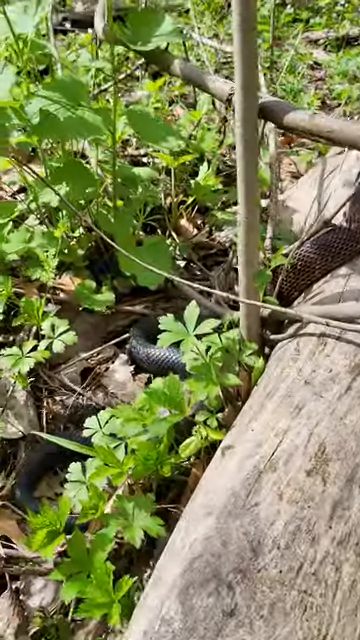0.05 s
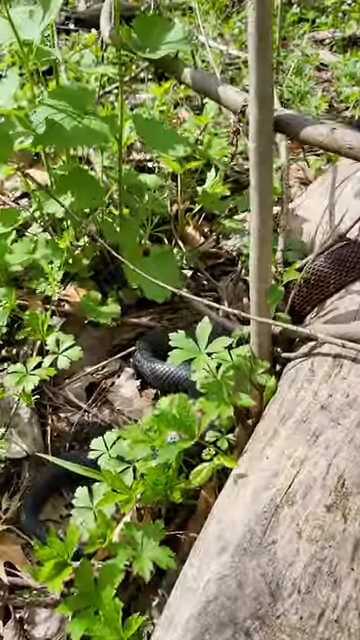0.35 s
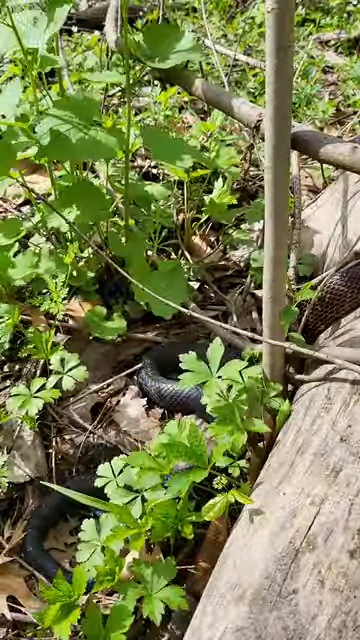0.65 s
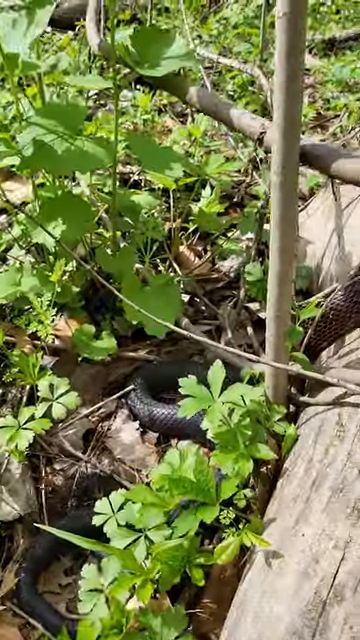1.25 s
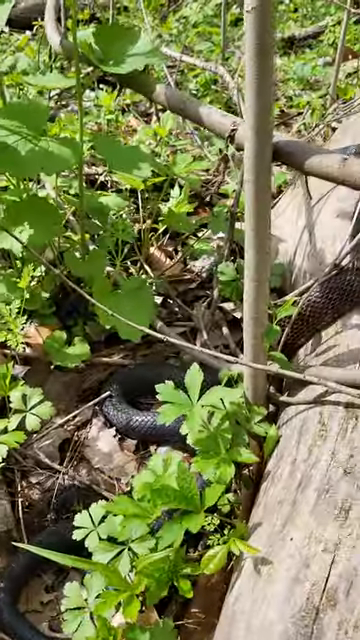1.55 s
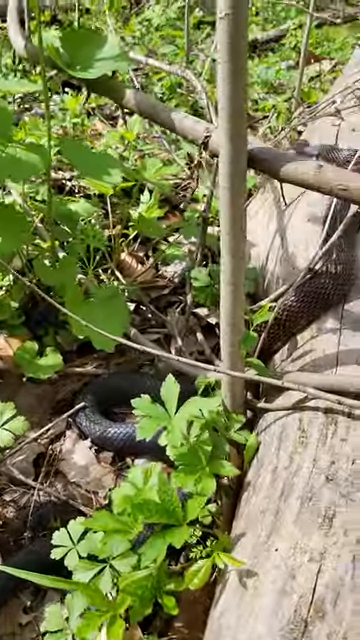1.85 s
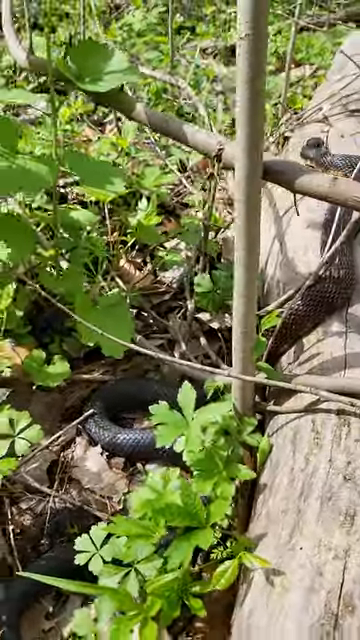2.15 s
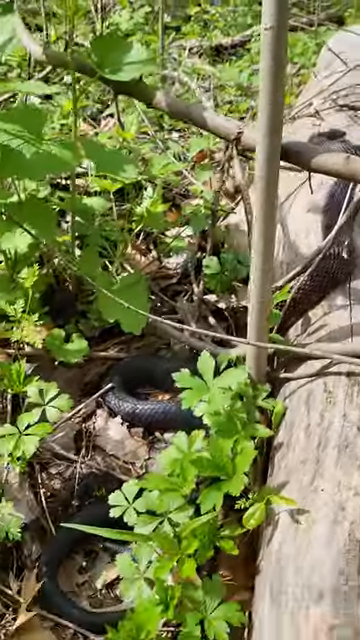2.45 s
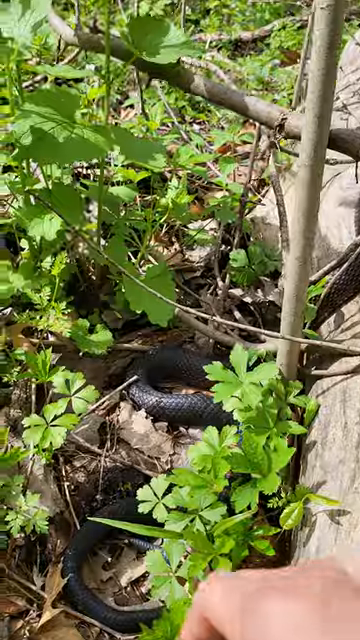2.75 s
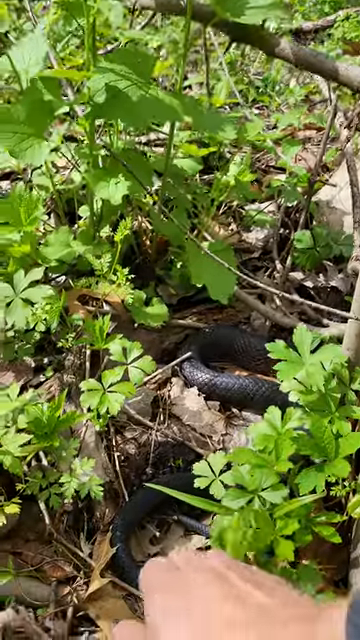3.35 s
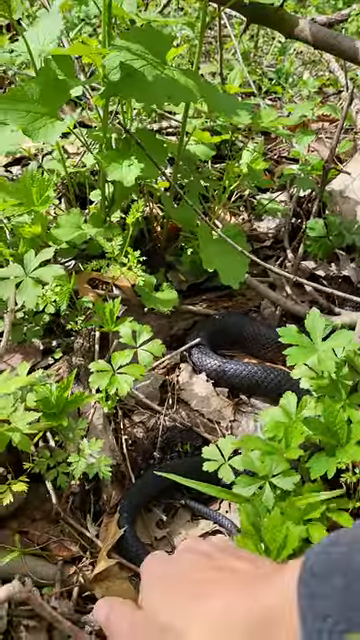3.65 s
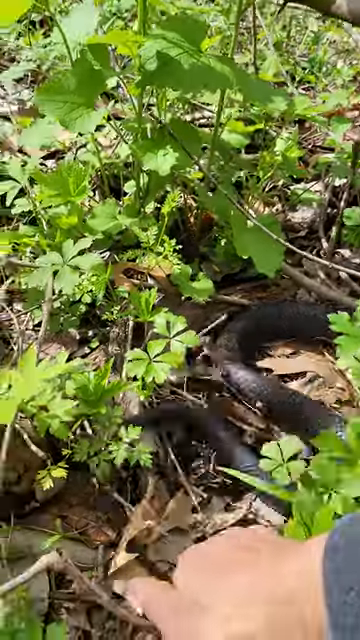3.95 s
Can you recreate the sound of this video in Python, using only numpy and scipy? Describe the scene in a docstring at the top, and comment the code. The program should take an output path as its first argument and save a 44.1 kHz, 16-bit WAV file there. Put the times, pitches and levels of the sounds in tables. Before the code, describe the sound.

A faint, papery rattle from a snake's tail in woodland leaf litter weakens and stops. Twigs knock, a sleeve swishes and leaves rustle near the microphone, while a low wind-like rumble and a far engine hum continue.

```python
"""A dry, fast rattle: a snake shakes its tail in leaf litter, about 39 strokes a second, then tires to a
faint ticking. Close by, someone shifts and reaches out: leaves snap, twigs knock, cloth swishes,
something scuffs and squeaks thinly, and leaves are brushed aside.
Under it lie a low outdoor rumble, a steady rush of air, a few soft buffets and a far engine's hum."""
import sys
import numpy as np
from scipy import signal
from scipy.fft import rfft, irfft
from scipy.io import wavfile

SR = 44100
rng = np.random.default_rng(int(sys.argv[2]) if len(sys.argv) > 2 else 0)


def store_pcm(level_fs):
    """Save levels as 16-bit WAV."""
    pcm = np.round(np.clip(level_fs, -1, 1) * 32767).astype(np.int16)
    wavfile.write(sys.argv[1], SR, np.atleast_2d(pcm).T)


N = 176400
TIME = np.arange(N) / SR


# Speed of the shake: t/s, rate/(strokes per s)
TAIL_RATE = [(0, 41.2), (.15, 39.5), (.45, 38.7), (.6, 38.3), (1.15, 38.65), (1.3, 36.5), (1.45, 37.5),
             (1.7, 37.2), (1.9, 38.8), (2.1, 37.3), (2.25, 36.3), (4, 36)]
# Effort of the shake, heard as loudness and brightness: t/s, level/dB, tilt/(dB per octave)
TAIL_EFFORT = [(0, -56, -1.5), (.45, -57.5, -1), (.7, -58.5, -1), (.85, -55.5, -1.5), (1.0, -53.8, 1.5),
               (1.15, -53.3, 1.5), (1.28, -56.5, 2), (1.5, -58, 0), (1.62, -64, -1), (1.82, -64, -.5),
               (1.87, -72, -3), (2.08, -72, -2), (2.24, -67.5, 0), (2.5, -90, 0)]
# Return stroke against forward stroke: t/s, level/dB
RETURN_STROKE = [(0, -8), (.45, -6), (.7, -1), (.9, -2), (1.15, -7), (1.3, -4), (1.8, -3), (2.05, -12)]
# Leaves the tip meets on every swing: delay/s, level/dB, decay/s, returning (1 = on the way back)
LEAF_CONTACTS = [(.0002, -3, .0022, 0), (.003, 0, .0018, 0), (.0083, -2.5, .001, 1), (.0118, 0, .0019, 1),
                 (.0187, -2.5, .0014, 1)]


def tail():
    """Each swing slaps the same few leaves, softer on the way back; they crackle as they settle."""
    first_stroke_s, attack_s, reach_s, ear_lag_s = .0062, .0003, .01, .00036
    forward_jitter_s, scatter_db, settle_db, litter_db = .0004, 1.5, -11, 5
    turns = np.cumsum(curve(TAIL_RATE)) / SR
    swings = np.interp(np.arange(int(turns[-1]) - 1), turns, TIME) + first_stroke_s
    return_gain = undb(curve(RETURN_STROKE))
    fractures = crackle(per_s=9000, scatter_db=2.2)
    contact = undb(settle_db) * return_gain
    for delay, db, decay_s, returning in LEAF_CONTACTS:
        for at, (late, strong) in zip(swings + delay, rng.standard_normal((len(swings), 2))):
            near = slice(max(int((at - reach_s) * SR), 0), int((at + reach_s) * SR))
            age = TIME[near] - at - forward_jitter_s * late * (1 + returning)  # looser on the way back
            slap = bell(age, np.where(age < 0, attack_s, decay_s))
            gain = undb(db + scatter_db * strong) * return_gain[near] ** returning
            contact[near] = np.hypot(contact[near], slap * gain)  # slaps add in power
    strokes = fractures * contact
    direct = np.array([np.roll(strokes, round(ear_lag_s * SR)), strokes])
    rattle = leaf_ring(direct + undb(litter_db) * litter(strokes))
    return unit(rattle) * undb(curve(TAIL_EFFORT)) * pan(-1.5)


# Papery ring of dry leaves: f/Hz, level/dB
LEAF_COLOUR = [(900, 0), (2000, -4), (3500, 1), (5000, -4), (6500, -.5), (7900, 4), (8800, -2), (9500, 4),
               (10500, -1), (11800, 2.2), (13700, -3.8), (15500, 2.2)]


def leaf_ring(x):
    """Strokes stir different leaves, so each band flickers on its own; harder shaking is brighter."""
    flicker_db, pivot_hz = 1.6, 8000
    centres, spacing = np.linspace(0, 16000, 9, retstep=True)
    spectrum = rfft(colour(x, LEAF_COLOUR))
    tilt = curve(TAIL_EFFORT, column=2)
    out = 0
    for hz in centres:
        band = irfft(spectrum * np.maximum(1 - np.abs(freqs() - hz) / spacing, 0), N)
        octaves = np.log2(max(hz, spacing) / pivot_hz)
        out = out + band * undb(flicker_db * wander(38) + tilt * octaves)
    return out


def crackle(per_s, scatter_db):
    """Random tiny fractures, a few much stronger than the rest."""
    hit = rng.random(N) < per_s / SR
    size = undb(scatter_db * np.minimum(rng.exponential(size=N), np.pi))
    return unit(hit * size * np.sign(rng.standard_normal(N)))


def litter(x, smear_s=.0005):
    """Scatter among many leaves smears each fracture into a brief hiss, different at each ear."""
    keep = np.exp(-1 / (smear_s * SR))
    power = signal.lfilter([1 - keep], [1, -keep], x ** 2)
    return np.sqrt(power) * rng.standard_normal((2, N))


def burst(at, decay_s, click_s=.0005, click_db=3):
    """A sharp click that dies away in a brief crack."""
    age = TIME - at
    shape = np.exp(-np.abs(age) / decay_s) + undb(click_db) * np.exp(-np.abs(age) / click_s)
    return rng.standard_normal((2, N)) * (age > 0) * shape


# Crisp single snaps: t/s, level/dB, f/Hz, ring against crack/dB, decay/s, pan L-R/dB
LEAF_SNAPS = [(.932, -52, 7660, 0, .0015, -5), (.982, -49, 9670, -6, .002, -5),
              (1.138, -50.5, 9600, -8, .0025, -5), (1.165, -51, 8140, -2, .0025, -5),
              (1.3265, -53.5, 8050, -3, .002, -5), (1.3555, -53, 7980, -2, .003, -5),
              (1.367, -50.5, 3750, 6.5, 0.0033, -5), (1.541, -53, 13600, 2, .0016, -4),
              (1.736, -58, 5900, -10, 0.0022, -1), (1.805, -54, 9000, -19, 0.0025, -1),
              (2.016, -59, 4470, -12, 0.0044, -4), (2.272, -56, 9150, -25, 0.0028, 0),
              (2.287, -55.5, 6944, -11, 0.0033, -1), (3.209, -64, 6700, 3, 0.0015, -3),
              (3.276, -62, 8800, -8, 0.0024, -5), (3.414, -60, 4504, -6, 0.0033, -7),
              (3.540, -59, 3560, 11, 0.0045, -6), (3.541, -53, 7850, 4, .0052, -8),
              (3.697, -58, 12000, -6, 0.002, -4)]


def leaf_snaps(q=13):
    """Dry leaves crack, each with a ring of its own."""
    out = 0
    for at, db, hz, ring_db, decay_s, side_db in LEAF_SNAPS:
        crack = burst(at, decay_s)
        tone = ring(crack, hz, hz / q) * np.sqrt(SR * q / hz / np.pi)  # as strong as the crack
        out = out + undb(db) * pan(side_db) * (colour(crack, LEAF_COLOUR) + undb(ring_db) * tone)
    return out


# Dull, woody knocks: t/s, level/dB, f/Hz, decay/s, pan L-R/dB
TWIG_KNOCKS = [(.2215, -40, 1600, .004, 2), (1.7225, -33.5, 700, .007, 1.5)]


def twig_knocks():
    """Twigs knock lower than the leaves, through a broad, heavily damped resonance."""
    out = 0
    for at, db, hz, decay_s, side_db in TWIG_KNOCKS:
        knock = double_ring(burst(at, decay_s), hz, .85 * hz) * np.sqrt(SR / hz) / 2
        out = out + undb(db) * pan(side_db) * knock
    return out


# Envelope of one short scuff: t/s, level/dB
SCUFF_LEVEL = [(1.99, -75), (2.003, -52), (2.009, -58), (2.016, -49), (2.023, -50), (2.034, -45.5),
               (2.048, -42), (2.054, -52), (2.065, -75)]
# Body of the scuff: f/Hz, half-width/Hz, level/dB
SCUFF_MODES = [(600, 400, -8), (1600, 150, -1), (2080, 340, -5), (2780, 140, -4.5), (3480, 100, -14),
               (4650, 450, -17), (9500, 2500, -22)]


def scuff():
    """Stick-slip catches ring a few resonances."""
    catches = litter(crackle(per_s=1630, scatter_db=.82))
    body = sum(undb(db) * unit(double_ring(catches, hz, 2 * half)) for hz, half, db in SCUFF_MODES)
    level_db = curve(SCUFF_LEVEL)
    gate = level_db > max(SCUFF_LEVEL[0][1], SCUFF_LEVEL[-1][1])
    return unit(body) * undb(level_db) * gate * pan(.9)


# Swell of the sleeve: t/s, level/dB
SLEEVE_LEVEL = [(0, -107), (2.42, -70), (2.6, -63.5), (2.85, -61), (3.05, -60.5), (3.23, -66.5),
                (3.45, -64), (3.62, -60), (3.78, -67.5), (4, -68)]
# Soft hiss of cloth: f/Hz, level/dB
SLEEVE_COLOUR = [(800, 7.5), (2200, 5.5), (4000, -4), (6000, -1.5), (7800, 0.5), (8800, -6), (11800, -3),
                 (13300, -6), (15500, -6)]


def sleeve(flicker_db=.9):
    """A sleeve swishes smoothly as the arm reaches out."""
    cloth = unit(colour(rng.standard_normal((2, N)), SLEEVE_COLOUR))
    return cloth * undb(curve(SLEEVE_LEVEL) + flicker_db * wander(15))


# Sudden rustle at the very end: t/s, level/dB
BRUSH_LEVEL = [(3.92, -91), (3.955, -53.5), (3.975, -46), (3.985, -43), (4, -43)]
# Full-bodied tone of that rustle: f/Hz, level/dB
BRUSH_COLOUR = [(200, 11), (900, 11.5), (2500, 6.5), (4500, 1), (7600, 8), (9000, 1.5), (13000, 1.5),
                (15500, 3)]


def brushed_leaves():
    """Leaves pushed aside give a dense run of tiny fractures."""
    rustle = colour(litter(crackle(per_s=2300, scatter_db=1.1)), BRUSH_COLOUR)
    return unit(rustle) * undb(curve(BRUSH_LEVEL)) * pan(.41)


# Soft rubs: t/s, level/dB, f/Hz, width/Hz, spread in time/s
CLOTH_RUBS = [(2.267, -65.5, 3280, 2500, .11), (2.7, -69, 3950, 2500, 0.17), (3.6, -71, 7400, 1000, 0.094)]


def cloth_rubs():
    """Cloth slides past the plants in soft swells of hiss."""
    out = 0
    for at, db, hz, width, spread_s in CLOTH_RUBS:
        hiss = unit(double_ring(rng.standard_normal((2, N)), hz, width))
        out = out + hiss * undb(db) * bell(TIME - at, spread_s)
    return out


# Thin squeaks, one list of points each: t/s, f/Hz, level/dB
SQUEAK_GLIDES = [
    [(2.015, 11750, -84), (2.04, 11550, -79), (2.08, 11950, -86)],
    [(2.095, 12700, -86), (2.135, 13050, -82), (2.16, 14200, -80), (2.182, 15700, -83)],
    [(2.35, 12050, -88), (2.38, 11550, -82), (2.405, 12050, -84)],
]


def squeaks(fade_s=.008, waver=.007):
    """Faint whistles that dip or glide upward at the top of hearing."""
    out = 0
    for glide in SQUEAK_GLIDES:
        start, end = glide[0][0], glide[-1][0]
        gate = np.clip(np.minimum(TIME - start, end - TIME) / fade_s, 0, 1)
        pitch_hz = curve(glide) * (1 + waver * wander(200))
        phase = 2 * np.pi * np.cumsum(pitch_hz) / SR
        out = out + np.sqrt(2) * np.sin(phase) * gate * undb(curve(glide, column=2))
    return out


def stray_ticks(level_db=-78.5):
    """Disturbed leaves tick faintly at random."""
    ticks = litter(crackle(per_s=38, scatter_db=5.3))
    return unit(colour(ticks, LEAF_COLOUR)) * undb(level_db)


# Soft, low thumps: t/s, level/dB, f/Hz, spread in time/s
WIND_BUFFETS = [(.305, -31.5, 65, 0.0066), (0.806, -35.5, 66, 0.018), (3.672, -30.5, 80, 0.0062)]


def wind_buffets():
    """Air bumps the microphone in brief low swells."""
    return sum(undb(db) * bell(TIME - at, spread_s) * np.sin(2 * np.pi * (hz * TIME + rng.random()))
               for at, db, hz, spread_s in WIND_BUFFETS)


# Drift of the engine's hum: t/s, f/Hz, level/dB
ENGINE_HUM = [(0, 87, -59), (.8, 84.16, -49.5), (1.4, 87.93, -46), (2.1, 87.15, -45.5), (2.6, 86.4, -59),
              (3.2, 88, -48), (4, 83, -50)]
# Its harmonics: multiple of the pitch, relative level/dB
ENGINE_HARMONICS = [(1, -1.5), (2, -14), (3, -21)]


def engine(waver=.016, flicker_db=2):
    """A far engine hums; its pitch wavers and each harmonic swells on its own."""
    pitch_hz = curve(ENGINE_HUM) * (1 + waver * wander(7.92))
    phase = 2 * np.pi * np.cumsum(pitch_hz) / SR
    hum = sum(undb(db + flicker_db * wander(5.6)) * np.sin(k * phase) for k, db in ENGINE_HARMONICS)
    return np.sqrt(2) * hum * undb(curve(ENGINE_HUM, column=2)) * pan(-1)


# Bass-heavy outdoor bed: f/Hz, level/dB
AIR_COLOUR = [(20, -18.5), (35, -7.5), (60, 2.5), (80, 0.5), (110, -1), (145, -8.5), (210, -13.5),
              (290, -15.5), (400, -16), (540, -24), (660, -20), (800, -19), (980, -22), (1200, -19.5),
              (1400, -20.5), (1650, -32.5), (2200, -33.5), (3400, -39), (5000, -44), (7800, -45.5),
              (8800, -61.5), (15500, -54.5)]
# Its stereo width: f/Hz, side against mid/dB
AIR_WIDTH = [(25, -20), (60, -11.5), (110, -21.5), (200, -10), (330, -3.5), (520, 3), (720, 1), (1290, 6),
             (2200, 1.5), (8000, 0)]
# Gentle fader ride on the rush of air: t/s, level/dB
RUSH_LEVEL = [(0, 1), (1, 0.75), (2, 1), (3, -1), (4, -0.5)]


def outdoors():
    """A nearly centred, unsteady rumble under a wide rush of air."""
    mid_db, crossover_hz, rumble_flicker_db, rush_flicker_db = -44.5, 300, 1.5, .7
    mid, side = colour(rng.standard_normal((2, N)), AIR_COLOUR)
    bed = (mid + np.array([[1], [-1]]) * colour(side, AIR_WIDTH)) / np.std(mid) * undb(mid_db)
    low = irfft(rfft(bed) / (1 + (freqs() / crossover_hz) ** 4), N)
    rumble = low * undb(rumble_flicker_db * wander(5.8))
    rush = (bed - low) * undb(curve(RUSH_LEVEL) + rush_flicker_db * wander(9.8))
    return rumble * pan(-1) + rush * pan(.35)


def undb(db):
    """Decibels to gain."""
    return 10 ** (np.asarray(db) / 20)


def unit(x):
    """Scale to rms 1."""
    return x / np.sqrt(np.mean(x ** 2) + 1e-30)


def curve(table, column=1):
    """One column of a table, joined by straight lines in time."""
    rows = np.array(table, float)
    return np.interp(TIME, rows[:, 0], rows[:, column])


def bell(age, spread_s):
    """A Gaussian swell that peaks at age 0."""
    return np.exp(-(age / spread_s) ** 2 / 2)


def freqs():
    """Frequency of each spectrum bin, at least 1 Hz."""
    return np.maximum(np.arange(N // 2 + 1) * SR / N, 1)


def colour(x, points):
    """Equalise through points of f/Hz, level/dB."""
    hz, db = np.array(points, float).T
    return irfft(rfft(x) * undb(np.interp(np.log(freqs()), np.log(hz), db)), N)


def ring(x, hz, width):
    """A damped resonance."""
    f = freqs()
    return irfft(rfft(x) / (1 + 1j * (f * f - hz * hz) / (f * width)), N)


def double_ring(x, hz, width):
    """The same resonance twice, for steeper skirts."""
    return ring(ring(x, hz, width), hz, width)


def pan(db):
    """Left and right gains, the left louder by db."""
    return undb(np.array([[db], [-db]]) / 2)


def wander(rate_hz):
    """Smooth random drift with rms 1."""
    return unit(irfft(rfft(rng.standard_normal(N)) * np.exp(-(freqs() / rate_hz) ** 2), N))


def scene():
    """The snake and the person's movements over the outdoor bed."""
    background = outdoors() + wind_buffets() + engine()
    snake = tail() + stray_ticks()
    person = leaf_snaps() + twig_knocks() + scuff() + sleeve() + brushed_leaves() + cloth_rubs()
    return snake + person + squeaks() + background


def record(dry, top_hz=15720):
    """A steep low-pass cuts the very top."""
    return signal.sosfilt(signal.ellip(10, .2, 70, top_hz, fs=SR, output="sos"), dry)


dry = scene()
out = record(dry)
store_pcm(out)
```